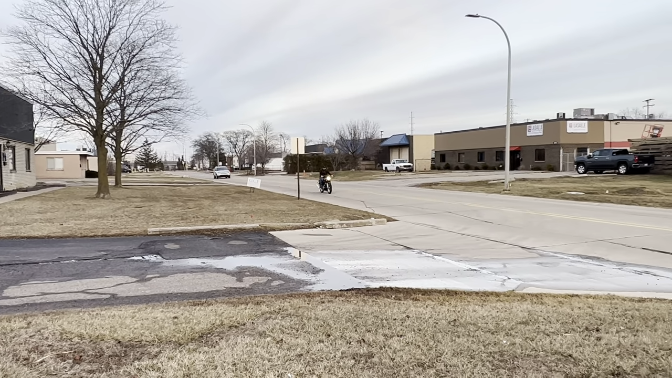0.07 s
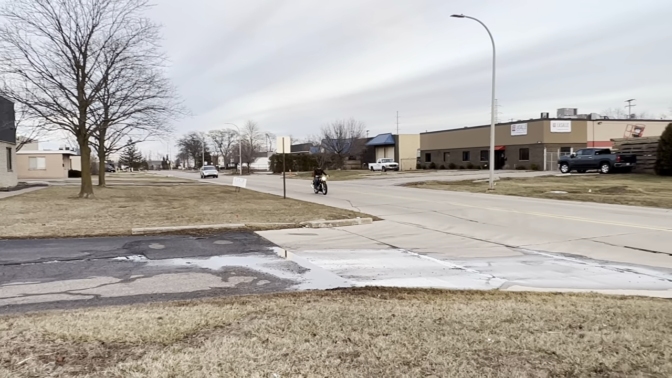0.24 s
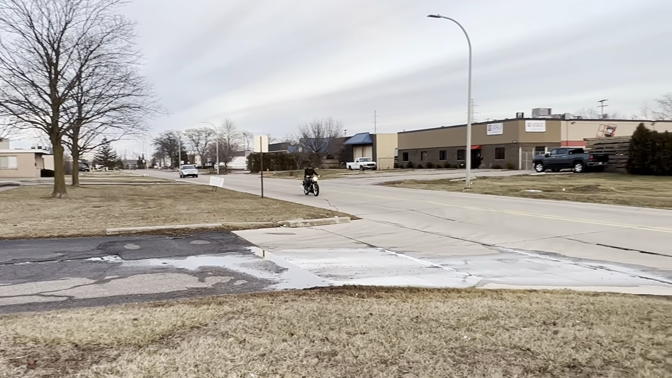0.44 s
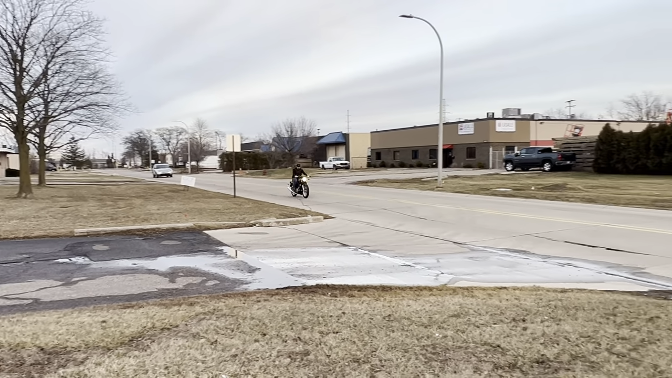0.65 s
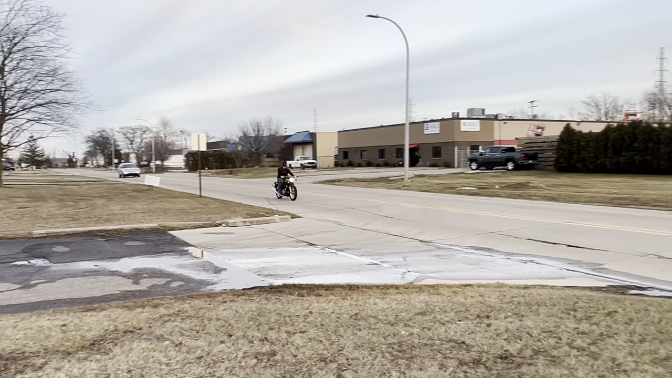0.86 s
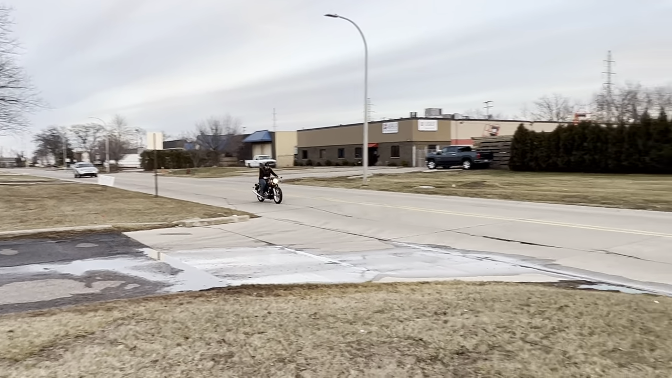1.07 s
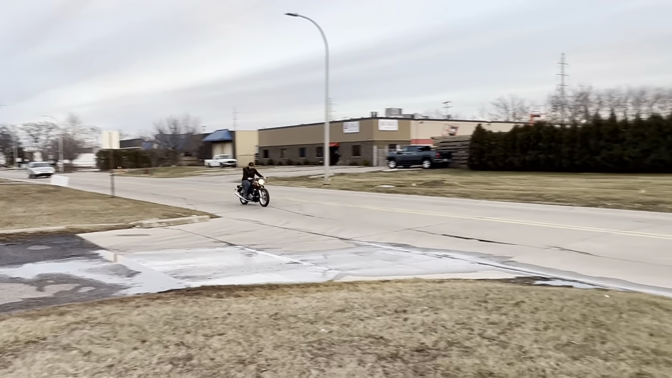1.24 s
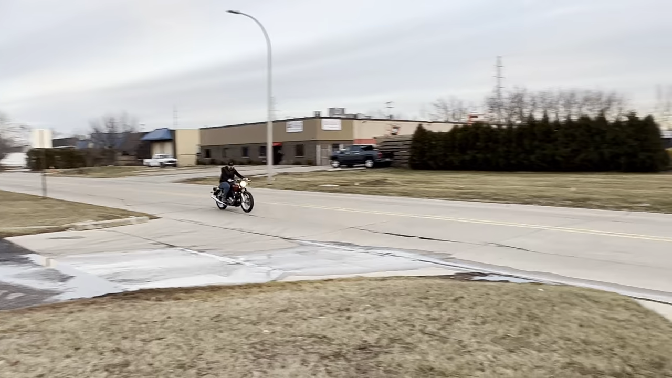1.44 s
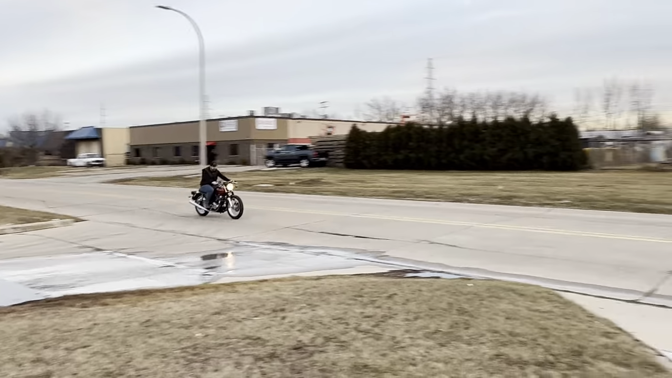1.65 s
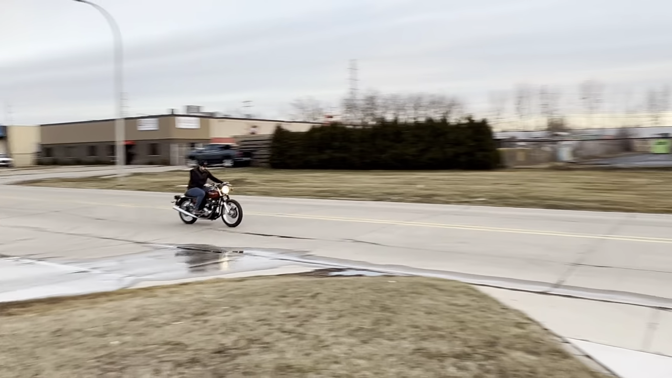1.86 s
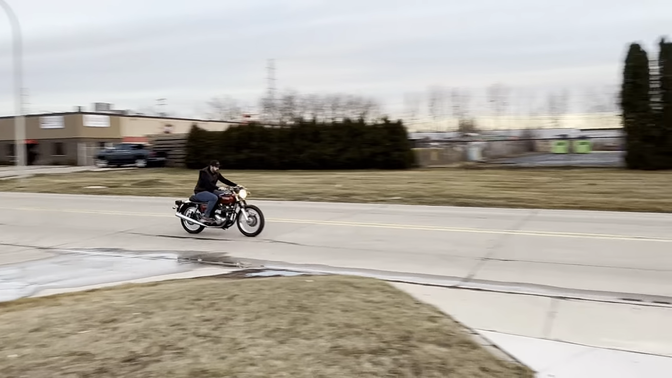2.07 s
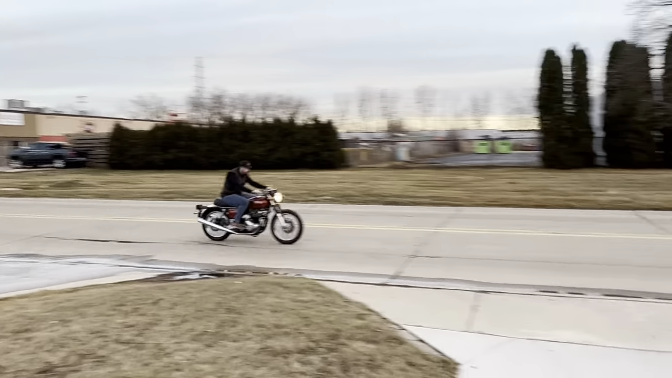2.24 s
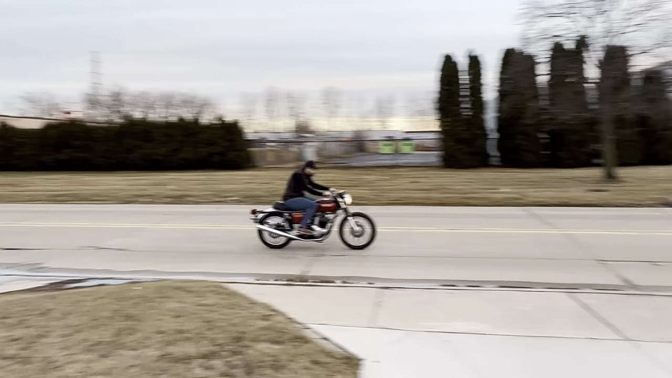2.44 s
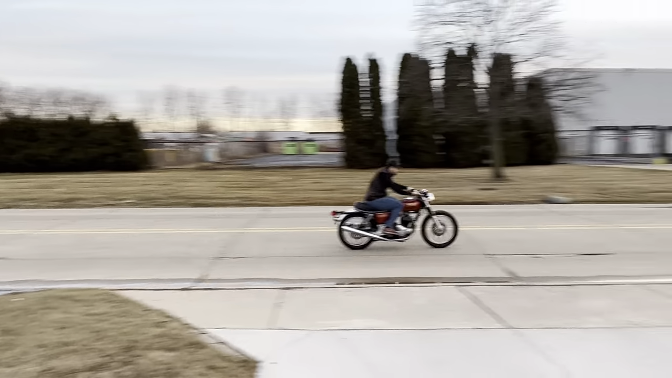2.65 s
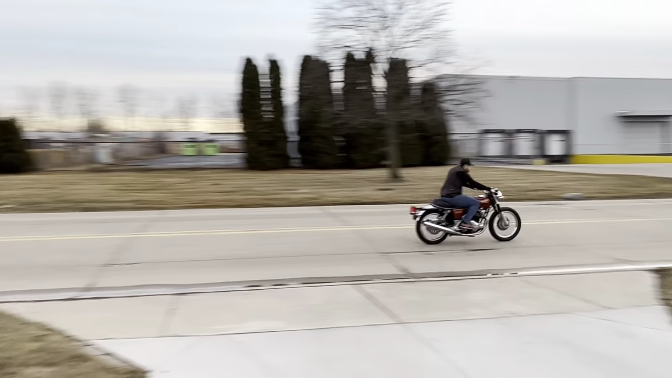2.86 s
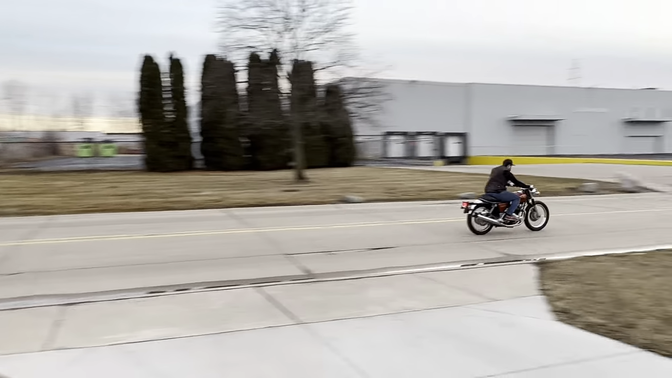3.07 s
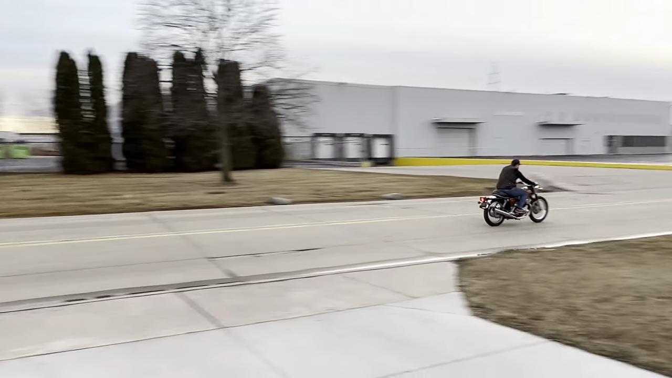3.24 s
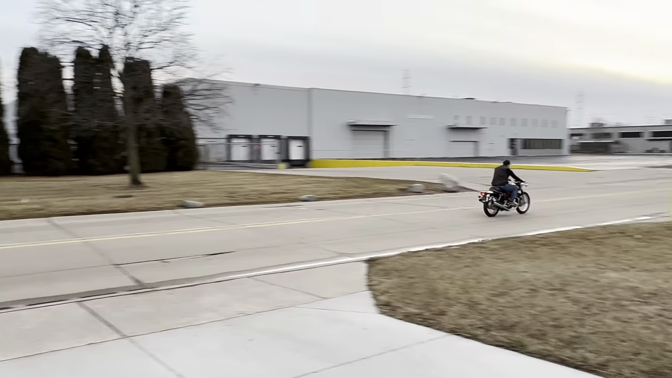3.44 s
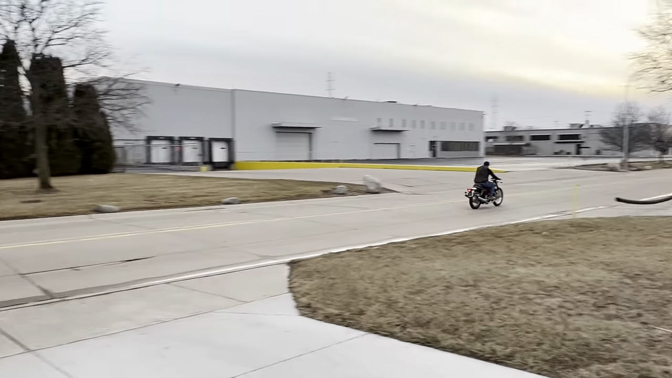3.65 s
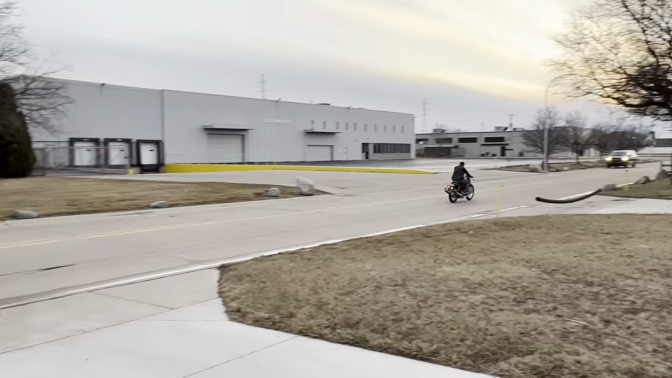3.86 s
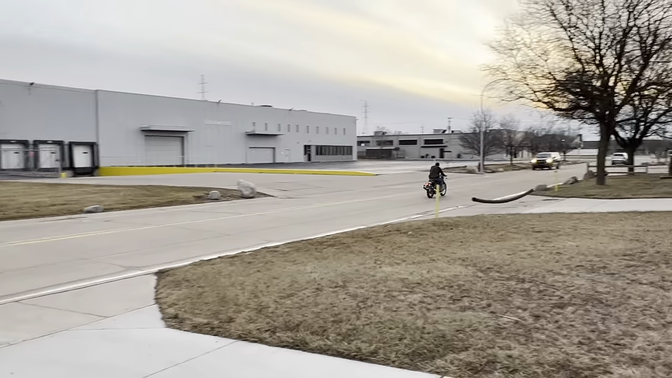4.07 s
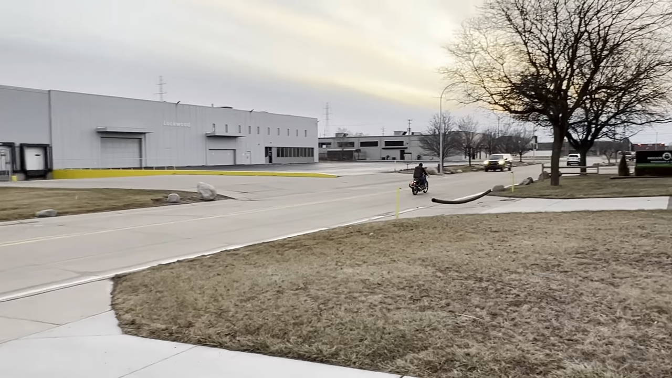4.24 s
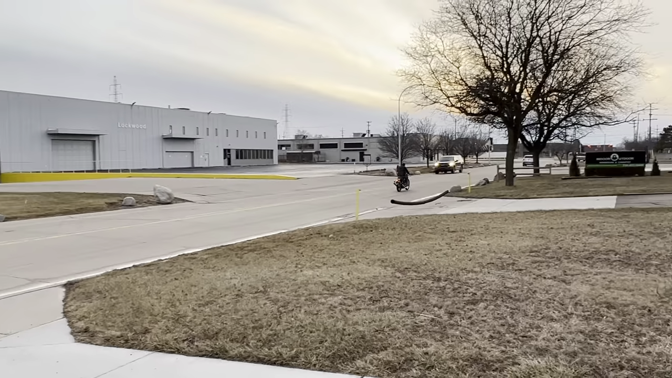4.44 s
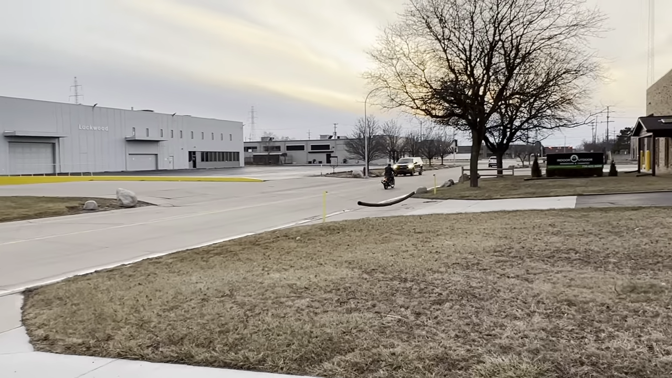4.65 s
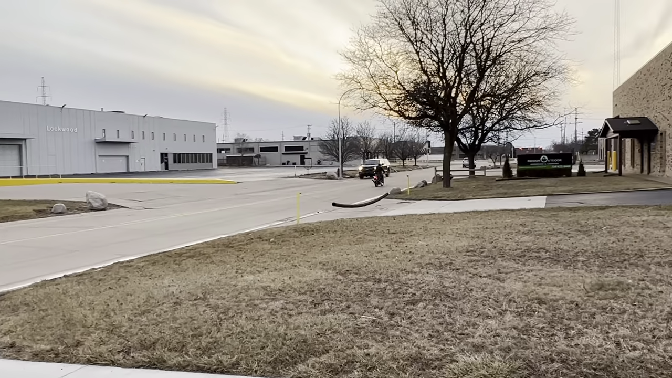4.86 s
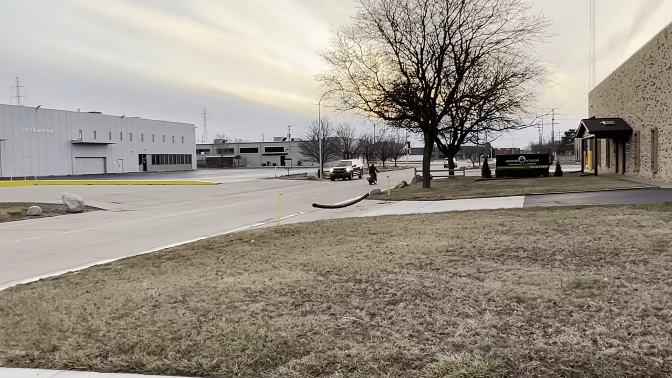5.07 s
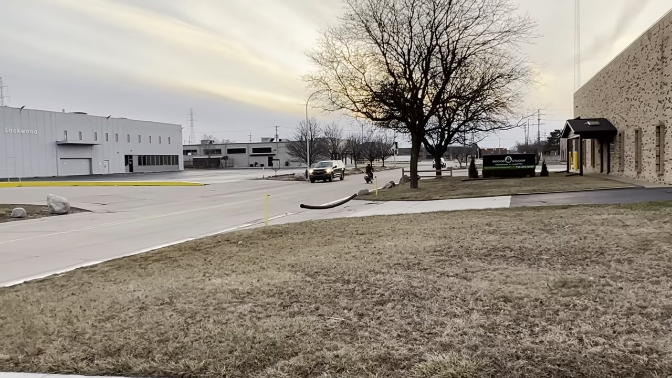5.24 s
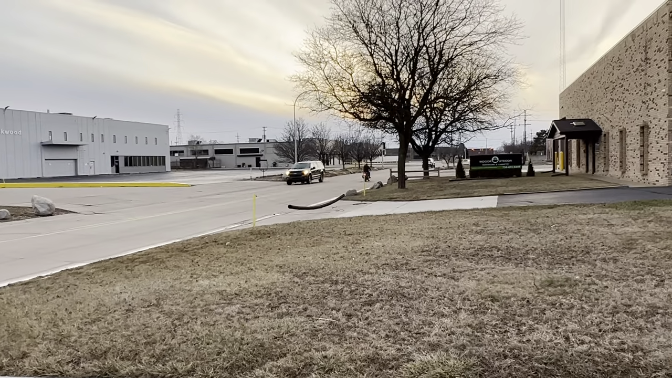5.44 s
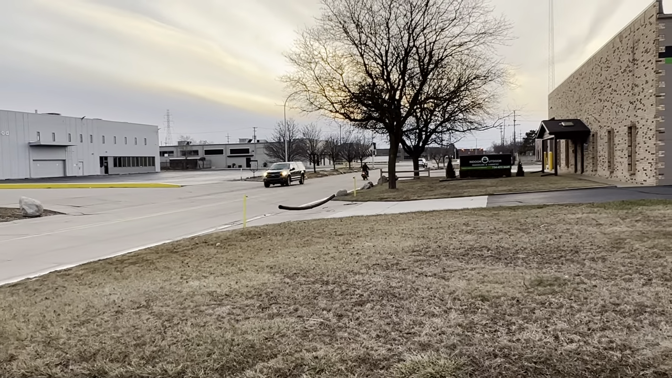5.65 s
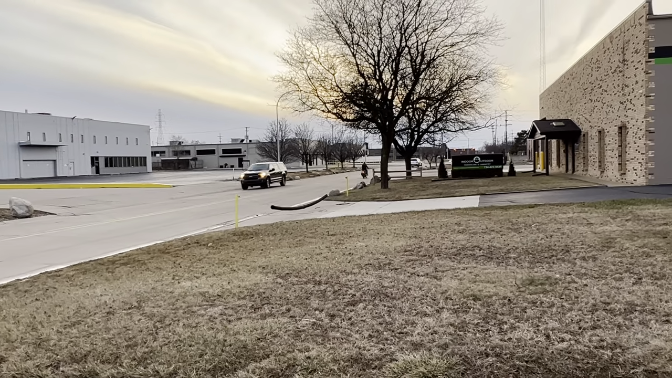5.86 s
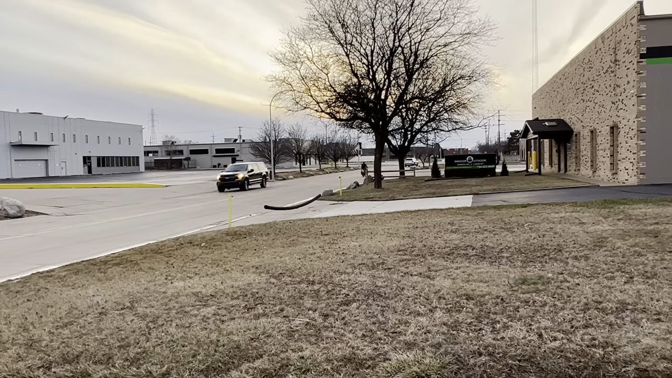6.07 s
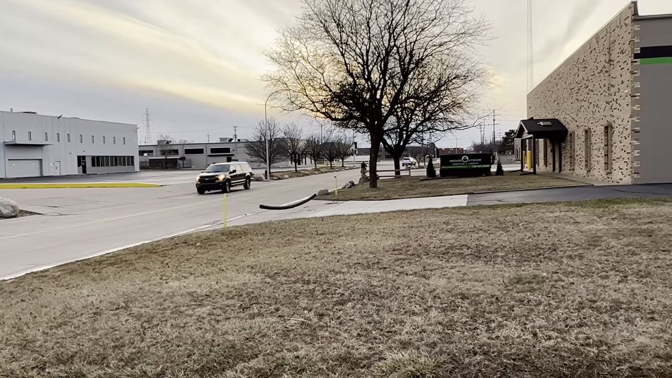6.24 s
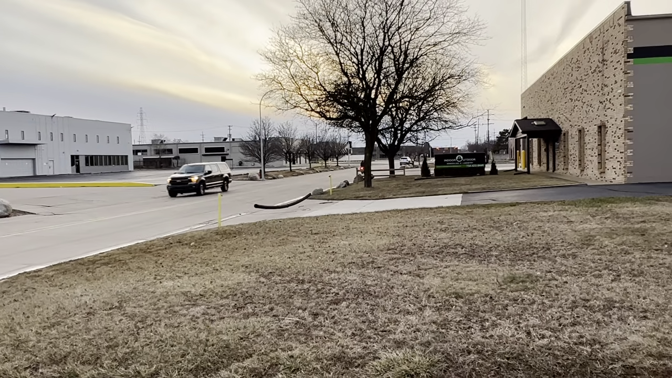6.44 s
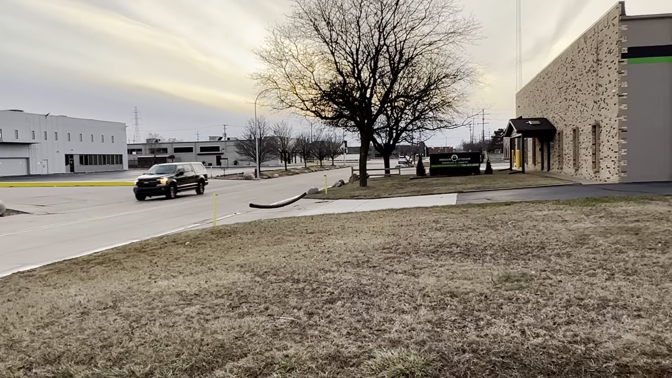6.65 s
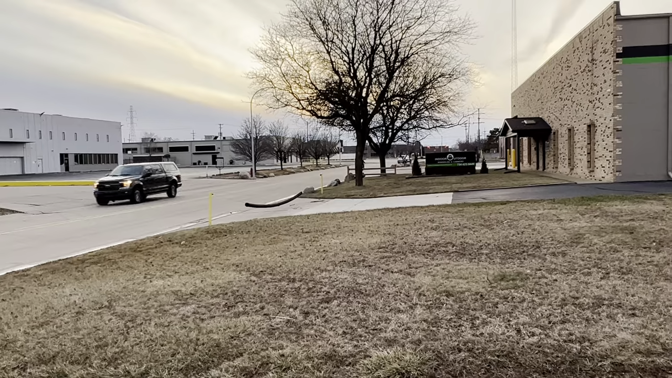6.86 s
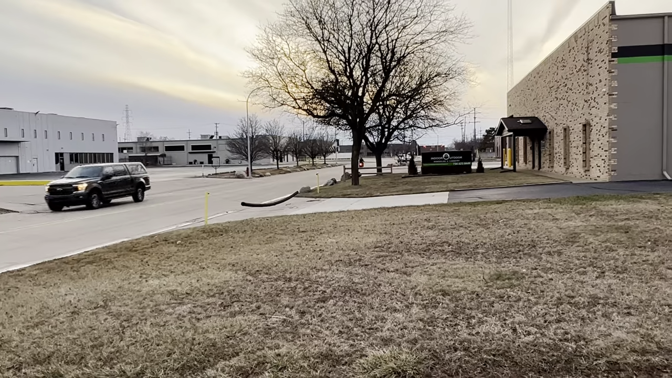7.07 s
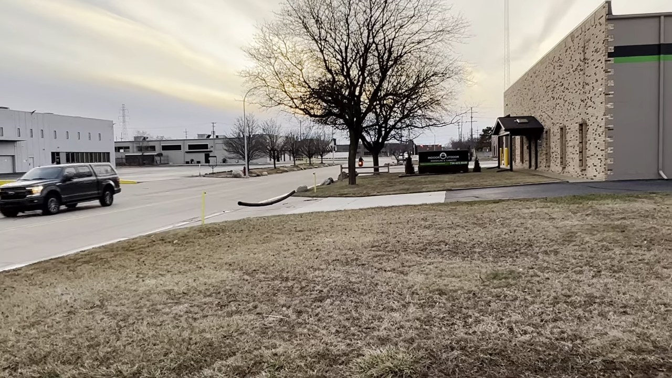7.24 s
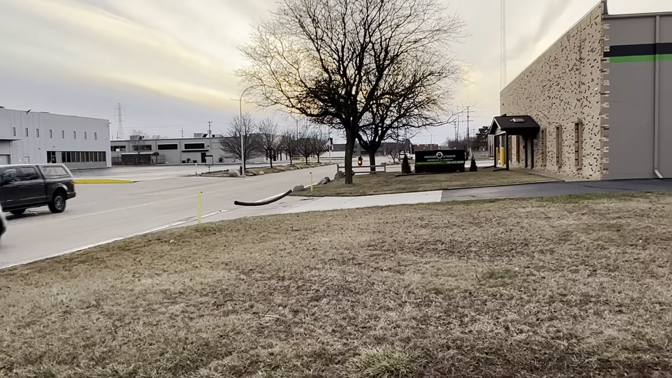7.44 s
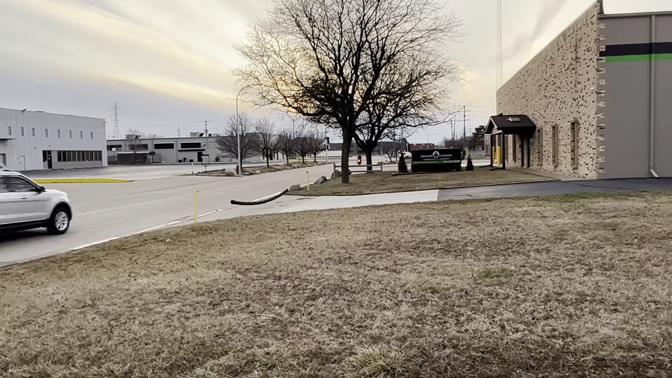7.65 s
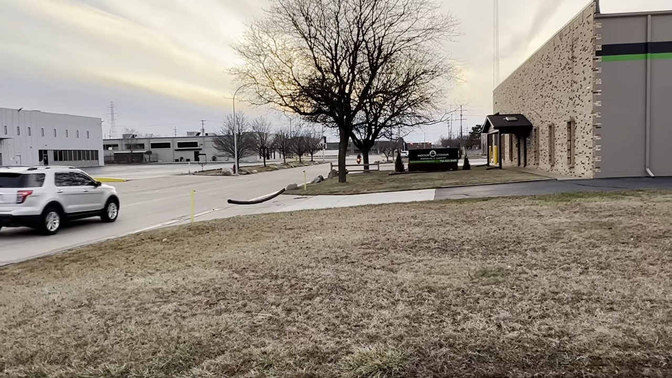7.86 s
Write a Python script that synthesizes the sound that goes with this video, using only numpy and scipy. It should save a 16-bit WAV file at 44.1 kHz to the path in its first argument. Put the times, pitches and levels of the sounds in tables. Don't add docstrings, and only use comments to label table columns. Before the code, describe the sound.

A twin-cylinder motorcycle accelerates past on a road, barks loudly, shifts gear with a pitch drop, recedes and coasts off as car tyres roll near.

```python
import sys
import numpy as np
from scipy import signal
from scipy.fft import rfft, irfft
from scipy.io import wavfile
from scipy.ndimage import uniform_filter1d

SR = 44100
rng = np.random.default_rng(int(sys.argv[2]) if len(sys.argv) > 2 else 0)


def magnitude_from_level(level_db):
    exponent = np.asarray(level_db, float) / 20
    return 10 ** exponent


def log_audio(samples):
    frames = np.atleast_2d(samples).T
    limited = np.clip(frames, -1, 1)
    pcm = np.round(limited * 32767).astype(np.int16)
    wavfile.write(sys.argv[1], SR, pcm)


N = 348390
T = np.arange(N) / SR
HZ = np.fft.rfftfreq(N, 1 / SR)
ABREAST_S = 2.4

# [t/s, heard firing rate/Hz, exhaust level/dB, nearness/dB below the closest point]
RIDE = [(0, 38.19, -37.5, -24), (.46, 39.43, -27.5, -18.5), (.99, 43.3, -22.5, -12.5),
        (1.45, 47.4, -17.5, -6), (2.15, 54, -16.5, -2.5), (2.45, 56.37, -19, -1.5), (2.72, 58.1, -16.5, 1),
        (2.82, 57.9, -18.5, -4.5), (2.88, 54.14, -16.5, 1), (3.12, 42.22, -20, -3.5),
        (3.24, 44.92, -21.5, -8), (3.32, 42.12, -21.5, -10), (3.6, 42.98, -22, -12),
        (4.14, 46.47, -20, -14), (4.7, 49.32, -24.5, -16), (4.95, 47.19, -30, -23), (6, 44.24, -34, -25.5),
        (7.9, 38.77, -38, -35.5)]
# [shut t/s, burns return t/s, gas rush returns t/s, closing time/s]
THROTTLE = [
    (2.84, 3.14, 3.22, 0.0075),
    (4.74, 9.5, 9.5, 0.035),
]
COAST_S = THROTTLE[1][0]


def exhaust():
    # [f/Hz, gain/dB]
    pipe_gain = [(40, -35.5), (70, -10), (160, -4), (210, 0), (255, -4.5), (290, -5), (325, -8.5),
                 (366, -7.5), (529, -11.5), (666, -20), (900, -26.5), (1500, -41.5), (4000, -93)]
    # [order, far ahead/dB, close/dB, from behind/dB]
    bark_orders = [(4, 8, 1, -0.5), (5, -1, 3.5, 5.5), (6, -2, -2, -1.5), (7, 1.5, 4, 1.5),
                   (8, 8, 0.5, 3.5), (9, 6.5, -5, -3.5)]
    hz, level_db, near_db = curves(RIDE)
    turns = firings(hz)
    close, rear = rise(1.0, .2), rise(3.02, .1)
    shifting, coasting = gear_change(), coast()

    weight = {}
    for k, far_db, close_db, rear_db in bark_orders:
        db = far_db + (close_db - far_db) * close + (rear_db - close_db) * rear
        weight[round(k)] = magnitude_from_level(db + 6 * (k < 5.5) * shifting)
    whole = sum(weight.get(k, 1) * (1 + .12 * drift(6)) * order(k, turns, 1.4) for k in range(4, 21))

    spread = 2.2 + .9 * rise(1.9, .35)
    half = sum(magnitude_from_level(min(-19 + 2.5 * k, -4)) * order(k + .5, turns, spread) for k in range(1, 21))
    half = half * magnitude_from_level(5 + .48 * near_db - .5 * rear)

    strength = magnitude_from_level(.6 * rng.standard_normal(600))[np.round(turns).astype(int)]
    pulses = (whole + half * (1 + .12 * drift(19))) * uniform_filter1d(strength, size=200)
    pulses = pulses + .35 * delayed(pulses, .007614)
    pulses = pulses + 3 * passed(1.0, early_s=-1.6) * order(6, turns, 1.407)
    kerb_gain = .85 * np.exp(-((T - 2.38) / .28) ** 2)
    pulses = pulses + kerb_gain * delayed(pulses, .00883)

    gas = 1.6 * rng.standard_normal(N) * np.exp(-(turns % 1) / .6) * (1 - .6 * shifting)
    bark = colour(pulses + gas, pipe_gain)
    dull = signal.sosfilt(signal.butter(3, 330, fs=SR, output="sos"), bark)
    bark = steady(bark + coasting * (dull - bark))[0]
    bark_db = level_db - 7.5 * shut(column=1) - 3 * coasting
    direct = drone(hz, turns, near_db) + magnitude_from_level(bark_db) * bark

    answer = 1.48 * rise(4.63, .56) * (1 - rise(COAST_S + .061, .091))
    return (direct + answer * delayed(direct, .0863)) / np.sqrt(1 + answer ** 2)


def drone(hz, turns, near_db):
    # [f/Hz, gain/dB]
    low_pipe = [(40, -12.5), (50, -5), (58, -0.5), (85, -2.5), (110, 1), (135, 5), (150, 1.5), (178, -5)]
    # [order, level abreast/dB, dB per dB of nearness, gear change/dB, coasting/dB]
    low_orders = [
        (1, -20, 0.56, -12, -3.5),
        (2, -14, .5, 2.5, 3.5),
        (3, -12, 0.65, -22.5, -19),
    ]
    u = T - 5.72
    slip = .2 + 1.9 * u - .125 * u ** 2
    back = .51 * rise(COAST_S + .13, .077)
    carry = magnitude_from_level(2.5 * rise(3.7, .12) - 5 * np.maximum(T - 6.2, 0))
    shifting, coasting = gear_change(), coast()
    out = 0
    for k, db, slope, shift_db, coast_db in low_orders:
        k = round(k)
        level_db = db + slope * near_db + read(low_pipe, k * hz)
        level = magnitude_from_level(level_db + shift_db * shifting + coast_db * coasting)
        if k % 2 == 0:
            level = level * carry
        out = out + np.sqrt(2) * level * (order(k, turns, 1.3) + back * order(k, turns + slip, 1.3))
    lulls_s = (THROTTLE[0][0] + .01, THROTTLE[0][1], COAST_S + .07)
    return out * magnitude_from_level(sum(-9 * np.exp(-((T - s) / .014) ** 2) for s in lulls_s))


def firings(hz):
    return np.cumsum(hz) / SR + 0.466


def order(k, turns, sweep):
    return np.cos(2 * np.pi * (k * turns - sweep * np.log(k)))


def engine_noise():
    # [f/Hz, level/dB]
    clatter = [(700, -2), (1100, 3.5), (1500, -7.5), (1750, 0), (2000, 1), (2350, -5.5), (2700, -1.5),
               (3200, -7.5), (3800, 1.5), (4300, -14.5)]
    # [f/Hz, level/dB]
    hiss_front = [(3300, -6), (3800, -4), (4400, -2.5), (5000, -3), (6000, -4), (6800, -6.5), (8500, -13),
                  (10800, -13.5), (13000, -12), (15600, -21.5)]
    # [f/Hz, level/dB]
    hiss_rear = [(3300, 0.5), (3800, -4), (4400, 5.5), (5000, -0.5), (6000, -2.5), (6800, -3.5),
                 (8500, -5.5), (10800, -5.5), (13000, -9.5), (15600, -14)]
    # [f/Hz on approach, width/Hz, level/dB]
    fin_rings = [
        (1130, 180, -20.5),
        (1987, 133, -11),
        (2665, 63, -14.5),
        (4230, 62, -25),
        (5830, 220, -17.5),
        (6300, 150, -16.5),
    ]
    clatter_db, hiss_db, share = noise_levels()
    behind = passed(.087)
    clatter_puffs = puffs(.056, .0087, 2.45, -.14)
    front_puffs = puffs(.026, .0026, 3.2, -1.7)
    rear_puffs = puffs(.036, .0039, 1.1, -.16)
    layers = [(closed(clatter), clatter_db, 1, .7, clatter_puffs),
              (closed(hiss_front, high_db=-1.5), hiss_db, np.sqrt(1 - behind), 1.01, front_puffs),
              (closed(hiss_rear, high_db=5.5), hiss_db, np.sqrt(behind), 1.01, rear_puffs)]
    out = 0
    for points, db, facing, depth, gate in layers:
        part = np.clip(share * depth, 0, 1)
        drive = rng.standard_normal((2, N)) * np.sqrt(1 - part + part * gate ** 2)
        out = out + magnitude_from_level(db - 1.0) * facing * evened(colour(drive, points))

    doppler = 1 - .0796 * rise(2.33, .1)
    knocks = rng.standard_normal(N) * (.54 + clatter_puffs)
    fins = 0
    for hz, width, db in fin_rings:
        fins = fins + magnitude_from_level(db + 2.5 * drift(4.905)) * evened(resonate(knocks, hz * doppler, width))
    fins_db = clatter_db - 6 * behind + 3 * np.exp(-((T - 2) / .35) ** 2)
    return out + magnitude_from_level(fins_db) * np.array([fins, np.roll(fins, 3000)])


def noise_levels():
    # [t/s, lasts/s, hiss gain/dB]
    afterburns = [
        (4.938, 0.081, 12.5),
        (5.277, 0.023, 7),
        (5.445, 0.033, 6),
        (5.853, 0.027, 4),
    ]
    near_db, closing, rear = curves(RIDE)[2], shut(column=2), rise(3.16, .12)
    clatter_db = -22 + near_db - 8.5 * closing
    hiss_db = -25.5 + near_db + 5 * rear - 9 * closing * (1 + .8 * rise(3.0, .2))
    hiss_db = hiss_db + sum(db * np.exp(-((T - s) / lasts_s) ** 2) for s, lasts_s, db in afterburns)
    share = .36 + (.28 - .36) * passed(.67)
    share = share + (.95 - share) * rear
    share = share + (.45 - share) * closing
    share = share + (.75 - share) * rise(afterburns[0][0] - .07, .02)
    return clatter_db, hiss_db, share


def puffs(lag, length_s, scatter_db, weak_db):
    hz = curves(RIDE)[0]
    turns = firings(hz) - lag + 2
    count = turns.astype(int)
    size = magnitude_from_level(scatter_db * rng.standard_normal(600))[count] * magnitude_from_level(weak_db * (count % 2))
    since_s = (turns % 1) / hz
    return evened(uniform_filter1d(size * np.exp(-since_s / length_s), size=170))


def shut(column, rows=THROTTLE):
    return sum(rise(row[0], row[3]) - rise(row[column], .015) for row in rows)


def gear_change():
    return shut(column=1, rows=THROTTLE[:1])


def coast():
    return shut(column=1, rows=THROTTLE[1:])


def passed(width_s, early_s=0.):
    return 1 / (1 + np.exp(-(T - ABREAST_S + early_s) / width_s))


def echoes(x):
    # [delay/s, level/dB]
    fronts = [
        (0.034, -12),
        (0.078, -24),
        (0.116, -15.5),
        (0.189, -26.5),
        (0.259, -25.5),
    ]
    out = np.zeros((2, N))
    for s, db in fronts:
        for side, skew_s in enumerate((0, .0006)):
            late = round((s + skew_s * (1 - 2 * rng.random())) * SR)
            out[side, late:] += magnitude_from_level(db) * x[:N - late]
    return out


def road_dip(x):
    band = irfft(rfft(x, axis=1) * np.exp(-((HZ - 754) / 166) ** 2), N, axis=1)
    return x - .64 * np.exp(-((T - 2.35) / .31) ** 2) * band


def slaps():
    # [t/s, peak level/dB, ring
    # f/Hz, left minus right/dB]
    tyre_strikes = [(5.2, -27.5, 1142, 17), (5.274, -31, 1368, 14), (5.458, -28, 1210, 23),
                    (5.678, -32, 1037, 18), (5.916, -41, 565.8, 1), (6.076, -25.5, 1324, 9),
                    (6.414, -23.5, 502.7, 4), (6.473, -25, 503.2, 3), (6.702, -19.5, 582, -2),
                    (6.827, -22, 704.5, 2.0), (7.056, -20, 590.4, 2), (7.117, -11.5, 795, 5.5),
                    (7.343, -14.5, 665, 4), (7.412, -24, 568, 2.0), (7.454, -24, 1020, 10),
                    (7.639, -28, 557, 3.0),
                    (6.0773, -32.5, 3092, -1), (6.702, -22, 1900, 7), (7.3432, -33.5, 3200, 0.0),
            (6.414, -29, 1050, 3), (6.432, -25, 520, 2), (6.702, -27, 1000, 0), (8.6, -25, 700, 4),
            (7.186, -26, 730, 3), (7.4558, -18, 1780, 6.0), (6.998, -45, 5930, 0.53),
            (7.5517, -42, 6300, 5.5)]
    out = np.zeros((2, N + SR))
    for s, db, hz, pan_db in tyre_strikes:
        u = np.arange(900) / SR * hz
        cycles = .55 + hz / 1700
        swell = (u / cycles) ** 2 * np.exp(2 - 2 * u / cycles)
        ring = magnitude_from_level(db) * np.sin(2 * np.pi * u) * swell
        start = round((s - cycles / hz / 2) * SR)
        out[:, start:][:, :len(u)] += ring * magnitude_from_level(np.array([[.5], [-.5]]) * pan_db)
    return np.array([out[0, :N], np.roll(out[1], 15)[:N]])


def cars():
    # [t/s, roar level/dB, second notch of the road echo f/Hz]
    tyres = [
        (0, -53.5, 2610),
        (4.8, -39, 2540),
        (5.7, -39.5, 2720),
        (6.1, -38.5, 3400),
        (6.6, -37, 3500),
        (6.9, -35.5, 3740),
        (7.15, -36.5, 4530),
        (7.4, -36.5, 6600),
        (7.9, -40, 6900),
    ]
    # [f/Hz, level/dB]
    roar_tone = [(300, -11.5), (500, -1), (800, 1.5), (1100, 3.5), (1500, -4.5), (2100, -9.5),
                 (3000, -15.5), (4500, -21), (6000, -26.5), (8000, -32.5), (11000, -44), (15600, -53)]
    # [f/Hz, level/dB]
    rumble_tone = [(25, -59), (45, -20.5), (62, 4), (85, -0.5), (118, 1.5), (170, -4), (230, -6),
                   (300, -11), (450, -18), (800, -65)]
    roar_db, notch_hz = curves(tyres)
    roar = evened(colour(rng.standard_normal((2, N)), closed(roar_tone, high_db=1)))
    echo = np.array([delayed(r, 1.5 / notch_hz) for r in roar])
    roar = roar + np.clip(1.1 - notch_hz / 5000, .05, .55) * echo
    roar = roar * magnitude_from_level(1.2 * drift(7))
    rumble = evened(colour(rng.standard_normal((2, N)), rumble_tone))
    rumble_db = -27 - 1.5 * rise(4.88, .08)
    return roar * magnitude_from_level(roar_db) + rumble * magnitude_from_level(rumble_db + 2.0 * drift(4.2))


def car_hum():
    # [t/s, f/Hz, level/dB]
    idle = [
        (5.2, 65.8, -54),
        (6.6, 65.8, -40.5),
        (7.9, 63.5, -33),
    ]
    hz, db = curves(idle)
    level = magnitude_from_level(db + 3 * drift(6.9) - 30 * (1.5 - rise(idle[0][0], .1)))
    return level * np.sin(2 * np.pi * np.cumsum(hz + 1.5 * drift(4)) / SR)


def ports(pair, column):
    # [f/Hz, left leads/rad]
    stereo_phase = [(0, 0), (1300, .2), (1550, -1), (2200, .4), (2450, -.6), (3700, 2.9), (4300, 1.6),
                    (5500, 0), (7500, -.7), (8400, -2.3), (9300, -np.pi), (10600, -np.pi),
                    (12600, -2 * np.pi), (14200, -2 * np.pi), (16000, -9.1)]
    # [f/Hz, left minus right/dB]
    port_balance = [(300, 1), (1400, 3), (1900, -3.5), (2250, 2), (2500, -6.5), (3400, -6.5), (4000, 6),
                    (4400, -1.5), (5000, 6), (5900, 6.5), (7000, -0.5), (9000, 0)]
    # [f/Hz, likeness near/0-1, likeness far/0-1]
    stereo_same = [(60, 0.99, 0.93), (206, 0.99, 0.96), (504, 0.97, 0.52), (1210, 0.88, 0.11),
                   (1800, 0.86, 0.088), (3500, 0.78, 0.15), (5450, 0.31, 0.14), (8640, 0.47, .45),
                   (9470, 0.98, 1), (10480, 1, 1), (11700, 0.43, .7), (12600, 0.71, 0.68),
                   (14200, 0.81, 0.83), (15200, .7, .6)]
    table = np.transpose(stereo_same)
    same = np.clip(read(np.transpose([table[0], table[column]]), HZ), 0, 1)
    a, b = rfft(pair, axis=1)
    balance_db = read(port_balance, HZ) * np.minimum(HZ / 700, 1) ** 2
    tilt = magnitude_from_level(balance_db / 2) * np.exp(.5j * np.interp(HZ, *np.transpose(stereo_phase)))
    return irfft([a * tilt, (same * a + np.sqrt(1 - same ** 2) * b) / tilt], N, axis=1)


def narrow_dips(x):
    # [f/Hz, width/Hz, depth/dB]
    dips = [
        (2295, 81, -4),
        (3750, 89, -5.5),
        (4410, 99, -4),
        (5400, 150, -5.5),
    ]
    gain_db = sum(db * np.exp(-((HZ - hz) / width) ** 2) for hz, width, db in dips)
    return irfft(rfft(x, axis=1) * magnitude_from_level(gain_db), N, axis=1)


def evened(x):
    return x / np.sqrt(np.mean(x ** 2) + 1e-20)


def steady(x):
    return x / np.sqrt(uniform_filter1d((x ** 2).mean(0), size=9000) + 1e-20)


def read(points, hz):
    f, value = np.transpose(points)
    return np.interp(np.log(hz + 1), np.log(f + 1), value)


def curves(rows):
    s, *columns = np.transpose(rows)
    return [np.interp(T, s, c) for c in columns]


def closed(points, low_db=-40, high_db=-40):
    low = (points[0][0] * 0.88, points[0][1] + low_db)
    high = (points[-1][0] * 1.36, points[-1][1] + high_db)
    return [low] + list(points) + [high]


def colour(x, points):
    log_gain = np.log(magnitude_from_level(read(points, abs(np.fft.fftfreq(8192, 1 / SR)))))
    taps = np.fft.ifft(np.exp(np.conj(signal.hilbert(log_gain)))).real[:4096]
    return signal.oaconvolve(np.atleast_2d(x), taps[None], axes=1)[:, :N]


def resonate(x, hz, width):
    turn = np.exp(2j * np.pi * np.cumsum(hz) / SR)
    r = np.exp(-np.pi * width / SR)
    return (turn * signal.lfilter([1], [1, -2 * r, r ** 2], x * turn.conj())).real


def delayed(x, late_s):
    return np.interp(T - late_s, T, x)


def drift(rate_hz):
    knots = rng.standard_normal(400)
    return np.interp(T * rate_hz, np.arange(len(knots)), knots)


def rise(at_s, width_s):
    return .5 + .5 * np.tanh((T - at_s) / width_s / 2)


def scene():
    beat, noise = exhaust(), engine_noise()
    returns = echoes(beat)
    high_pass = signal.butter(2, 230, "high", fs=SR, output="sos")
    other = magnitude_from_level(13.0) * signal.sosfilt(high_pass, returns[1])
    near = ports(noise + [beat, other] + magnitude_from_level(-7) * echoes(noise[1]), column=1)
    near = near + magnitude_from_level(-8) * returns
    return narrow_dips(road_dip(near)) + ports(cars(), column=2) + slaps() + car_hum()


def low_pass(x):
    return signal.sosfilt(signal.butter(12, 15900, fs=SR, output="sos"), x)


def record(dry):
    cut = signal.sosfilt(signal.butter(3, 34, "high", fs=SR, output="sos"), dry)
    cut = signal.oaconvolve(cut, signal.firwin(401, 15750, window=("kaiser", 9), fs=SR)[None], "same")
    rounded = 1.3 * np.tanh(cut / 1.3)
    return low_pass(rounded)


dry = scene()
out = record(dry)
log_audio(out)
```